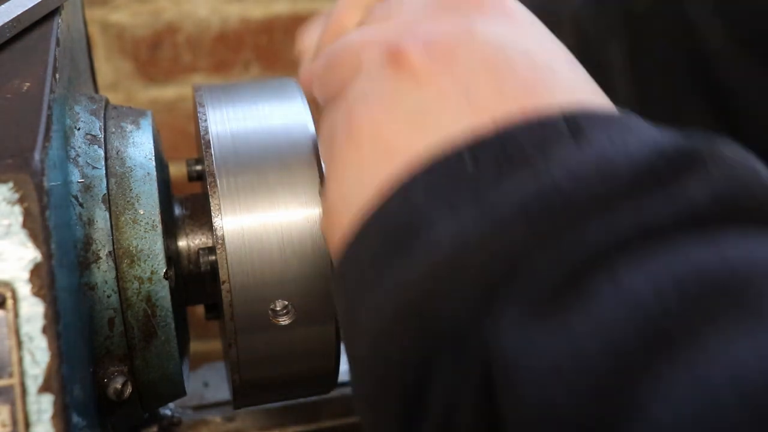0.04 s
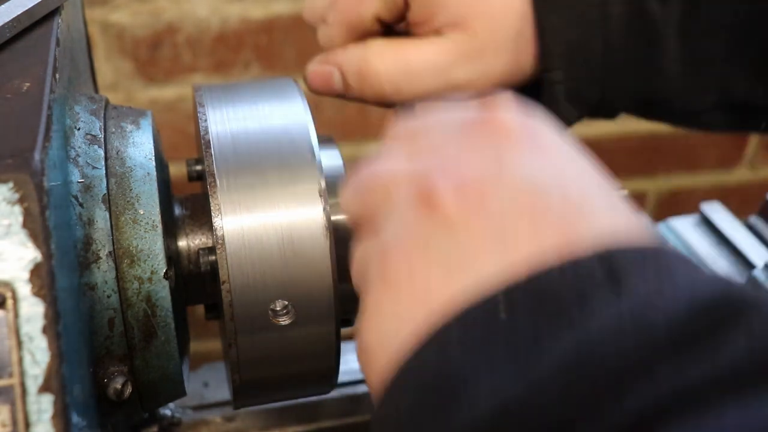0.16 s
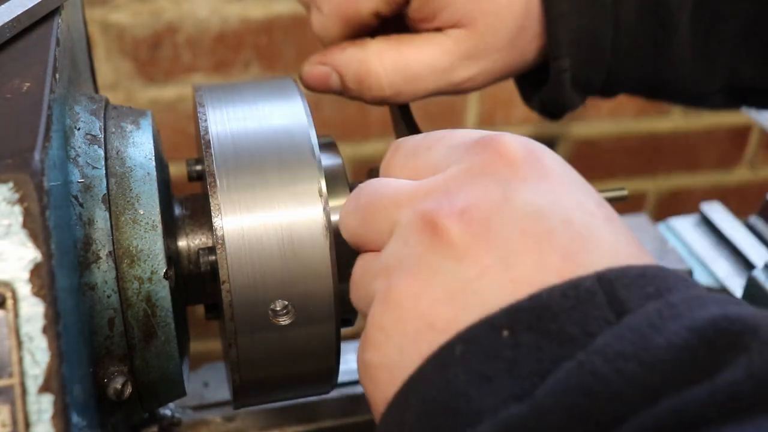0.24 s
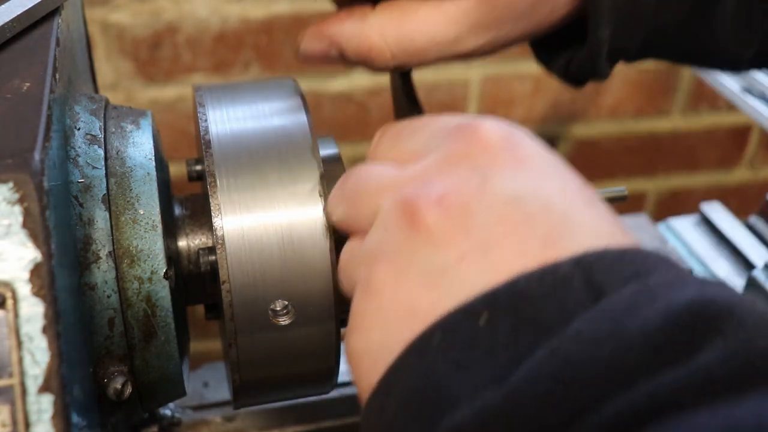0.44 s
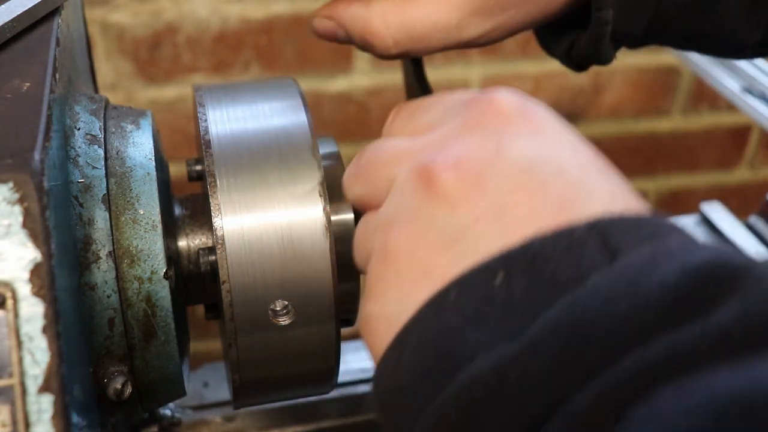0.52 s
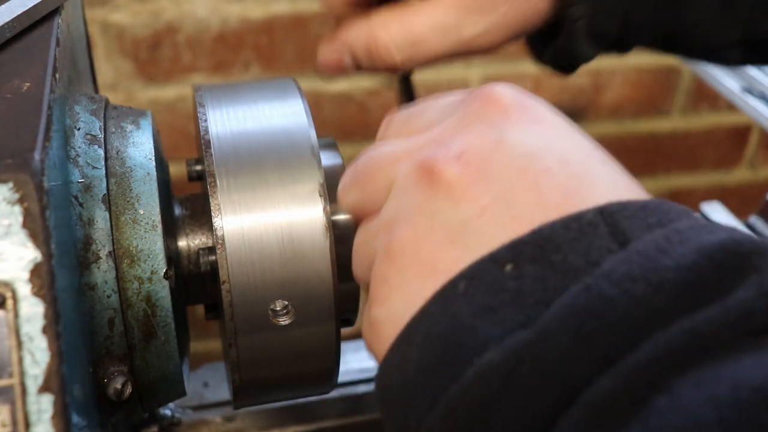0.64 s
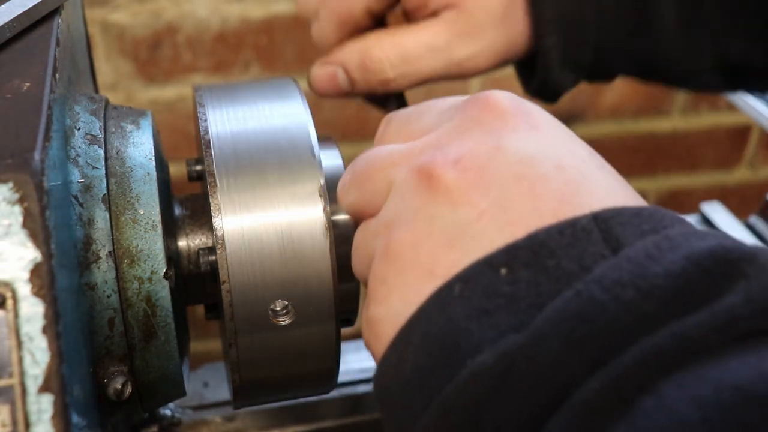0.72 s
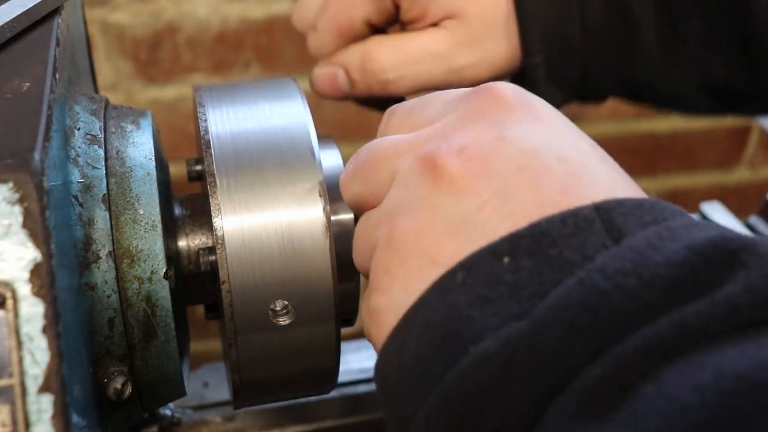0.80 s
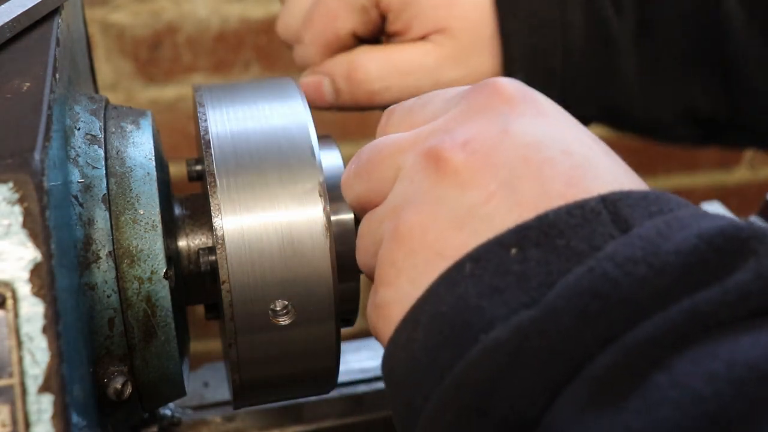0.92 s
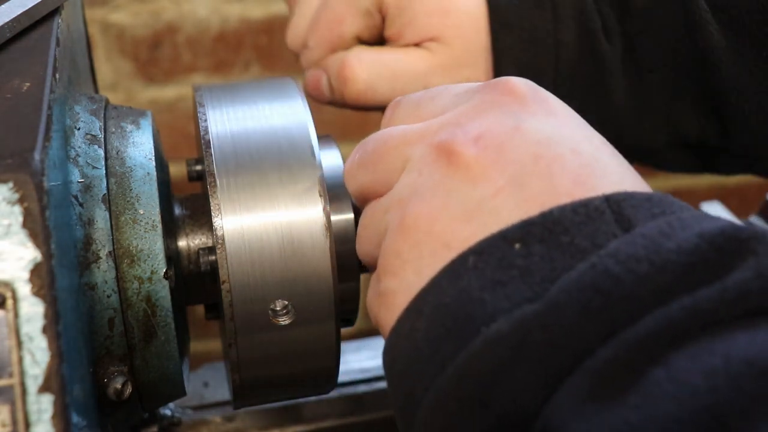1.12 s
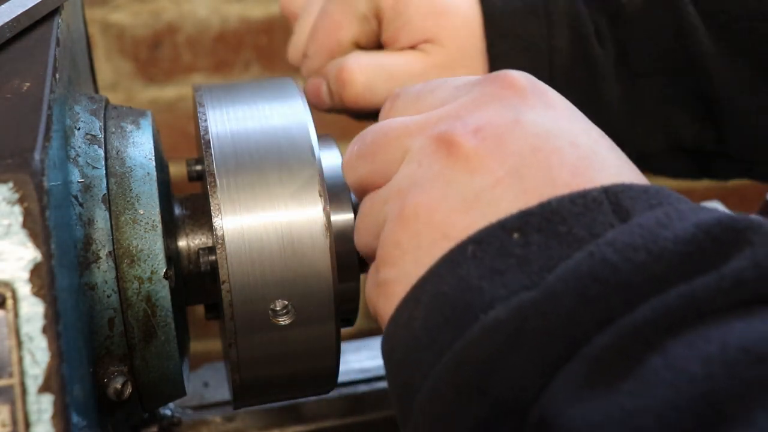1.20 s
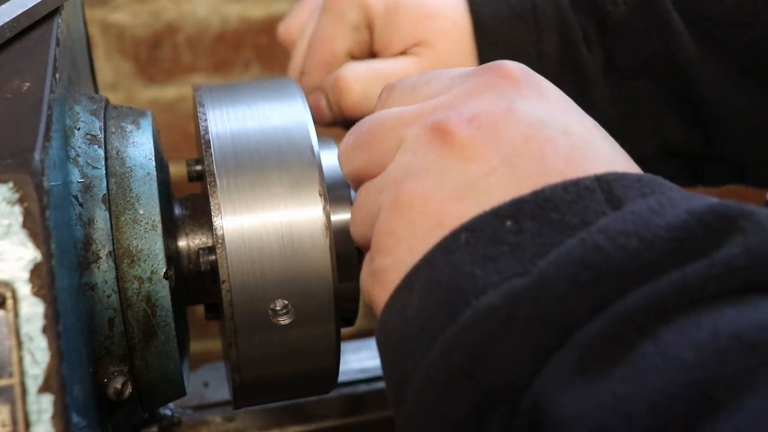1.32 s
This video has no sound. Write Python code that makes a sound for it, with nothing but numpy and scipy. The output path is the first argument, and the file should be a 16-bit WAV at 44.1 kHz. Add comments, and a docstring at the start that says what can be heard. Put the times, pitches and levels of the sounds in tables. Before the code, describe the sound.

A lathe chuck clicks as hands fit a part and seat the key. First come a low thump and one sharp clink, then soft scraping and a short rattle of clicks, heard up close in a quiet workshop.

```python
"""Steel clicks of a lathe chuck, close by in a small workshop: hands fit a part and seat the key.
Each contact rattles for a few ms and rings key, socket, jaws, workpiece and lathe body.
A dull bump of the hand sets the machine booming. Between the clicks metal slides faintly
on metal, with soft handling rumbles, over quiet room hiss."""
import sys
import numpy as np
from scipy import signal
from scipy.fft import rfft, irfft
from scipy.io import wavfile
from scipy.ndimage import uniform_filter1d

SR = 44100
rng = np.random.default_rng(int(sys.argv[2]) if len(sys.argv) > 2 else 0)


def unload_audio(sound):
    """Save the sound as a 16-bit wav file, at the path given as the first command line argument."""
    columns = np.transpose(np.atleast_2d(sound))
    # keep every value between -1 and 1, then stretch to whole-number steps
    steps = np.round(np.clip(columns, -1, 1) * 32767)
    wavfile.write(sys.argv[1], SR, steps.astype(np.int16))


N = 59535


def amp(db):
    """dB to gain."""
    return 10 ** (np.asarray(db) / 20)


def unit_rms(x):
    """Scale to rms 1."""
    return x / np.sqrt(np.mean(x ** 2) + 1e-20)


def lookup(points, hz, column=1):
    """Interpolate a table column over log frequency."""
    table = np.array(points)
    return np.interp(np.log(hz + 1), np.log(table[:, 0] + 1), table[:, column])


def add(mix, start_s, sound):
    """Add sound in place, cropped to the mix."""
    at = round(start_s * SR)
    sound = sound[max(-at, 0):]
    part = mix[max(at, 0):][:len(sound)]
    part += sound[:len(part)]


def noise(shape):
    """Noise of rms 1 with amplitude spectrum shape(hz)."""
    size = 2 ** 16
    spectrum = rfft(rng.standard_normal(size)) * shape(np.fft.rfftfreq(size, 1 / SR))
    return unit_rms(irfft(spectrum))[:N]


def rub(length_s, mid_hz, glide_oct_per_s, width_hz, level_db, grain_db):
    """One stroke of grainy friction; its resonance glides as the contact moves."""
    grain_s = 0.0022
    t = np.arange(0, length_s, 1 / SR)
    real, imag, roughness = rng.standard_normal((3, N))
    pole = np.exp(-np.pi * width_hz / SR)
    baseband = signal.lfilter([1], np.poly([pole, pole]), real + 1j * imag)
    settled = baseband[N // 2:][:len(t)]
    hz = mid_hz * 2 ** (glide_oct_per_s * (t - length_s / 2))
    friction = (settled * np.exp(2j * np.pi * np.cumsum(hz) / SR)).real
    grain = amp(grain_db * unit_rms(uniform_filter1d(roughness, round(grain_s * SR))))[:len(t)]
    return amp(level_db) * np.sin(np.pi * t / length_s) * unit_rms(friction * grain)


def sliding_metal():
    """Faint, bright friction of metal on metal."""
    # Each row: start in s, length in s, resonance in Hz, glide in octaves/s, width in Hz, level in dB.
    strokes = [(-.02, 0.075, 5340, 0.5, 1500, -62), (-.02, 0.045, 1852, 0, 2660, -51.5),
               (0.042, .1, 2970, -0.5, 402, -61.5), (0.394, .16, 9660, -1.5, 1800, -61),
               (0.459, .19, 4170, 0.6, 800, -54.5), (0.482, 0.11, 6820, -4, 2170, -56),
               (0.507, 0.12, 1414, 2, 440, -58), (0.557, 0.081, 5110, 1, 690, -52.5),
               (0.675, 0.061, 4000, -3, 600, -57), (0.729, 0.0445, 6110, -3.5, 900, -50),
               (0.73, 0.043, 2968, -3, 1520, -48.5), (0.733, .06, 9070, -1, 1000, -49.5),
               (0.963, 0.081, 3830, 1.5, 405, -57.5), (1.03, .15, 3685, -4, 900, -58.5),
               (1.218, .045, 3060, 0.5, 300, -56)]
    out = np.zeros(N)
    for start_s, *stroke in strokes:
        add(out, start_s, rub(*stroke, grain_db=2))
    return out


def room_hiss():
    """Steady background noise, strongest in the bass."""
    # Each row: frequency in Hz, relative density in dB.
    spectrum = [(15, -39), (25, 1), (70, -1), (141, -6), (363, -11), (439, -12), (545, -11), (887, -15),
                (2550, -18.5), (2990, -18), (3720, -16), (16000, -28)]
    return amp(-55.5) * noise(lambda hz: amp(lookup(spectrum, hz)))


def handling_rumble():
    """Soft, low rubs from handling."""
    # Each row: start in s, length in s, resonance in Hz, glide in octaves/s, width in Hz, level in dB.
    strokes = [(0.108, 0.098, 78.6, 0.21, 30, -55.5), (.77, 0.1, 138.7, 0.19, 14, -53.5),
               (.86, 0.19, 152.6, -0.056, 41, -55), (.87, 0.157, 510, -0.73, 38, -53),
               (1.056, 0.072, 79, 0, 17, -54.5), (1.25, 0.094, 65.3, 0, 11, -55)]
    out = np.zeros(N)
    for start_s, *stroke in strokes:
        add(out, start_s, rub(*stroke, grain_db=-0.5))
    return out


def machine_boom(bump_s):
    """One low tone of the bumped machine: swells, dips, returns weaker, sags in pitch."""
    # Each row: time in s, rms level in dB.
    envelope = [(.19, -101), (.224, -25.5), (.24, -25.5), (.33, -22), (.365, -26), (.435, -38.5),
                (.461, -53), (.487, -38.5), (.54, -39.5), (.605, -40.5), (.676, -49.5), (.72, -71),
                (.75, -54.5), (.89, -57.5), (.93, -84)]
    boom_hz, sag_hz_per_s = 81.8, 2.2
    t = np.arange(N) / SR
    hz = boom_hz - sag_hz_per_s * (t - bump_s)
    level_db = np.interp(t, *np.transpose(envelope))
    return np.sqrt(2) * amp(level_db) * np.sin(2 * np.pi * np.cumsum(hz) / SR)


def ring(modes, tilt_db_per_oct=0):
    """Decaying sines of a struck part, tilted about 1 kHz."""
    t = np.arange(N // 2) / SR
    return sum(amp(db + tilt_db_per_oct * np.log2(hz / 1000) - 60 * t / t60_s)
               * np.sin(2 * np.pi * hz * t) for hz, db, t60_s in modes)


def hand_bump():
    """A soft blow swells into the machine's low modes."""
    # Each row: frequency in Hz, level in dB, T60 in s.
    modes = [(107.7, -39.5, 0.97), (136.2, -36.5, 0.79), (187, -42.5, 0.69), (197.4, -34.5, 0.28),
             (235.2, -21.5, 0.14), (282.6, -30, 0.26), (397, -48, 0.038), (746, -39.5, 0.048)]
    rise_s = 0.0084
    t = np.arange(N // 2) / SR
    return np.minimum(t / rise_s, 1) * ring(modes)


def steel_click(rattle_s, crack_db, crack_tilt, body_db, body_tilt, *part_db):
    """Hard rattling contact, then the ring of the parts and the lathe body. Tilts in dB/octave."""
    # Each row: frequency in Hz, relative density in dB.
    crack_spectrum = [(100, -39), (300, -6.5), (600, 2.5), (820, -16), (1200, 1.5), (1650, 7), (2150, -5.5),
                      (2700, 1.5), (3700, -2.5), (5200, -3), (7000, -4.5), (9000, -11.5), (11000, -22.5),
                      (14000, -28), (16500, -45)]
    # Each row: mode frequency in Hz, relative level in dB, T60 in s.
    key = [(2710, -2.5, 0.021), (2700, -6, 0.047), (4420, -12, 0.041), (4884, -1, 0.051),
           (5004, -2.5, 0.046), (5710, -5, 0.046), (5710, -5.5, 0.021), (8250, -19.5, 0.1),
           (8750, -20, .08)]
    socket = [(1646, -7, 0.074), (2480, -4.5, 0.023), (4423, -5.5, 0.042), (5060, -3.5, 0.043),
              (5864, -7, 0.039), (6030, -14, 0.055), (8930, -14.5, 0.047), (13200, -14.5, 0.031),
              (14040, -17, .02)]
    jaw = [(1360, -6.5, 0.046), (3690, -9.5, 0.071), (4575, -2, 0.033), (4920, -9.5, 0.11),
           (6570, -6.5, 0.043), (6650, -12, 0.016), (7860, -3, 0.013), (10040, -9.5, 0.022),
           (11120, -5, 0.012)]
    workpiece = [(2896, 1.5, 0.17), (3150, -2.5, 0.18), (3394, -10.5, 0.42), (3317, -7, 0.2)]
    lathe_body = [(449, -13.5, 0.22), (544.8, -9.5, 0.34), (603, -4.5, 0.25), (645.7, -5, 0.081),
                  (988, -8.5, 0.25), (1207, -4, 0.099), (1364, -7.5, 0.2), (1610, -4, 0.044),
                  (1763, -4, 0.097), (1858, 0, 0.089), (2112, -17.5, 0.23)]
    rise_s, body_rise_s = 0.00059, 0.0013  # the heavy casting answers later
    clatter_db, clatter_s, clatter_top_hz = -10, 0.016, 7950  # duller scatter off the machine
    grip_db, grip_s = -10.5, 0.0074  # contact and fingers soak up much of the ring at once
    t = np.arange(N // 2) / SR

    def colour(hz):
        return amp(lookup(crack_spectrum, hz) + crack_tilt * np.log2(hz / 4000 + 0.062))

    crack = noise(colour)[:len(t)] * np.exp(-(t / rattle_s) ** 2)
    dull_noise = noise(lambda hz: colour(hz) / (1 + (hz / clatter_top_hz) ** 4))[:len(t)]
    clatter = amp(clatter_db) * np.exp(-t / clatter_s) * dull_noise
    grip = amp(grip_db) + (1 - amp(grip_db)) * np.exp(-(t / grip_s) ** 2)
    parts = sum(amp(db) * ring(modes) for db, modes in zip(part_db, (key, socket, jaw, workpiece)))
    body = amp(body_db) * (1 - np.exp(-t / body_rise_s)) * ring(lathe_body, body_tilt)
    attack = np.minimum(t / rise_s, 1)
    return attack * (amp(crack_db) * (crack + clatter) + grip * parts) + body


def workshop_echo(x):
    """Sparse reflections; each band decays at its own rate."""
    # Each row: frequency in Hz, gain in dB, T60 in s.
    bands = [(100, 6.5, 0.58), (350, 2.5, 0.41), (590, -2, 0.26), (845, 0.5, 0.17), (1510, -10, 0.28),
             (4200, -16, 0.33), (8600, -8, 0.28), (14800, -24, 0.22)]
    delay_s, reflections_per_s = 0.005, 4000
    taps = rng.choice([-1., 1.], N) * (rng.random(N) < reflections_per_s / SR)
    hz, t, spectra = signal.stft(unit_rms(taps), SR, nperseg=256)
    t60_s = lookup(bands, hz, column=2)[:, None]
    decay = amp(lookup(bands, hz)[:, None] - 60 * t / t60_s)
    energy_norm = np.sqrt(2 * np.log(1000) / (t60_s * SR))
    tail = signal.istft(spectra * decay * energy_norm, SR, nperseg=256)[1]
    out = np.zeros(N)
    add(out, delay_s, signal.fftconvolve(x, tail)[:N])
    return out


def scene():
    """All sources centred; only clicks and slides feed the echo."""
    # Each row: start in s, rattle length in s, crack gain in dB and tilt in dB/octave,
    # body gain in dB and tilt in dB/octave, then key, socket, jaw and workpiece gains in dB.
    contacts = [(0.2656, 0.004, -24, -1, -32.5, 2.5, -16.5, -31.5, -44, -37),
                (0.3262, 0.0069, -38, 6.5, -52, 0, -52, -59, -36, -44),
                (0.7559, 0.0027, -26.5, 1, -40, -2.5, -35, -29, -58, -40.5),
                (0.7573, 0.003, -29.5, -1, -39, -4, -44, -22.5, -53, -57),
                (.8060, 0.0056, -36, 8, -48, -1, -65, -59, -30, -64),
                (0.8495, 0.011, -36.5, 1, -48.5, -9.5, -48, -67, -26.5, -63),
                (0.8636, 0.0055, -31, -0.5, -48, -7, -41, -36, -48, -27),
                (0.8721, 0.0079, -36.5, -4, -44.5, -3, -36.5, -45, -65, -34.5)]
    bump_s = 0.2085
    steel = np.zeros(N)
    for start_s, *contact in contacts:
        add(steel, start_s, steel_click(*contact))
    steel += sliding_metal()
    low = handling_rumble() + machine_boom(bump_s)
    add(low, bump_s, hand_bump())
    mix = steel + workshop_echo(steel) + low + room_hiss()
    return np.array([mix, mix])


def record(dry):
    """Independent faint hiss per channel, then a low-pass."""
    # Each row: frequency in Hz, relative density in dB.
    hiss_spectrum = [(15, -43), (25, -1), (1790, -23.5), (3340, -33), (3620, -37), (4030, -33),
                     (6560, -23.5), (16000, -19)]
    hiss_db, cutoff_hz = -68, 16200
    hiss = np.array([noise(lambda hz: amp(lookup(hiss_spectrum, hz))) for _ in dry])
    lowpass = signal.firwin(511, cutoff_hz, window=("kaiser", 9), fs=SR)
    return signal.oaconvolve(dry + amp(hiss_db) * hiss, lowpass[None], "same")


dry = scene()
out = record(dry)
unload_audio(out)
```